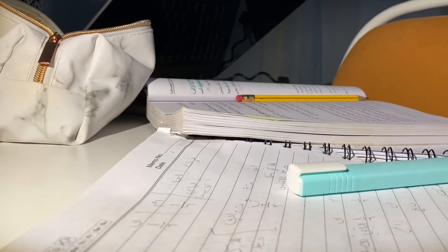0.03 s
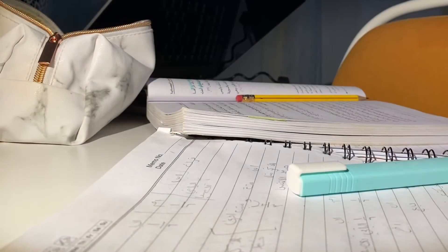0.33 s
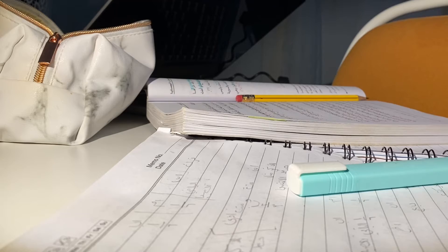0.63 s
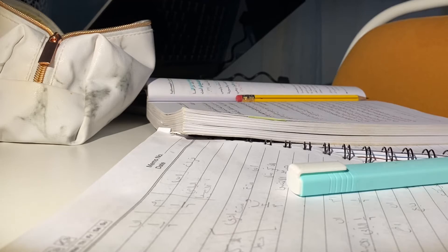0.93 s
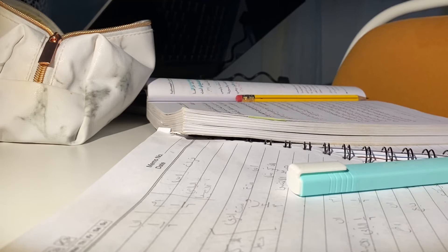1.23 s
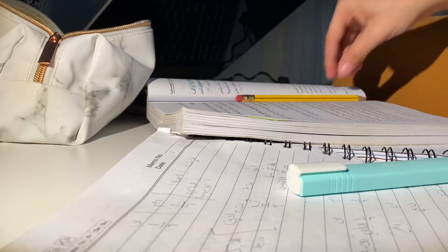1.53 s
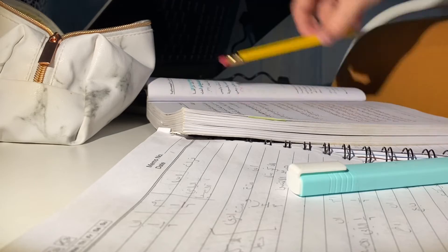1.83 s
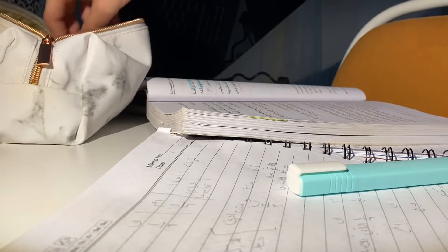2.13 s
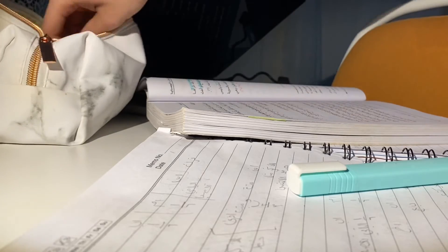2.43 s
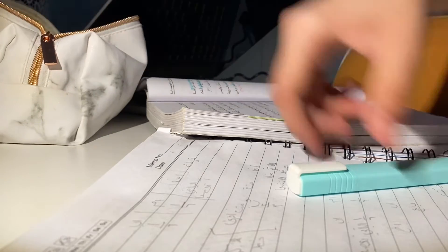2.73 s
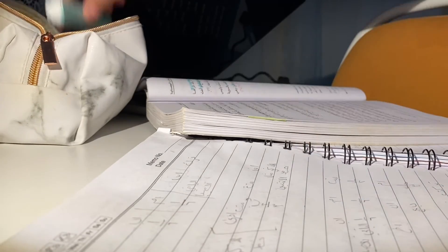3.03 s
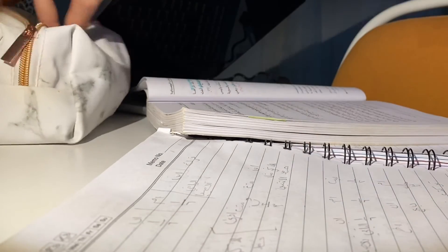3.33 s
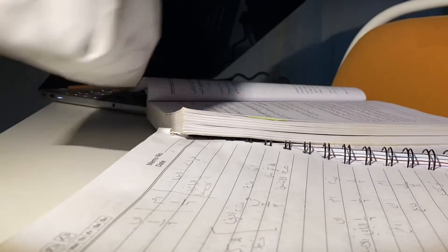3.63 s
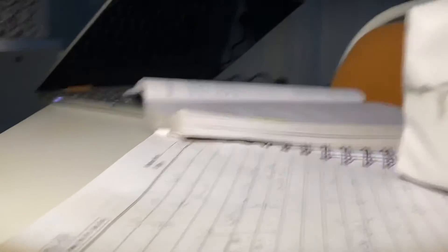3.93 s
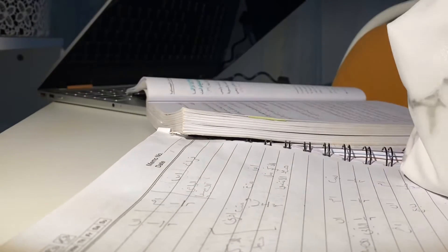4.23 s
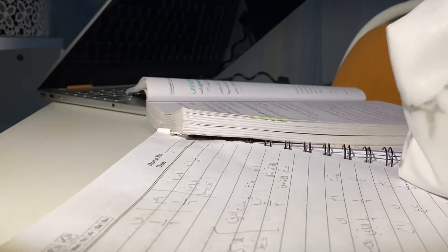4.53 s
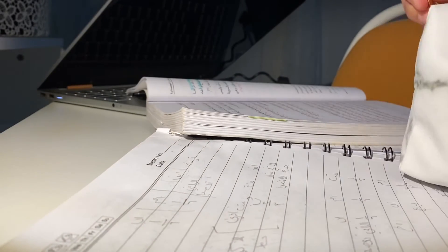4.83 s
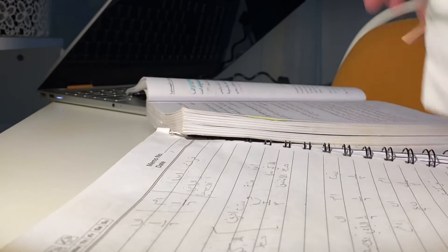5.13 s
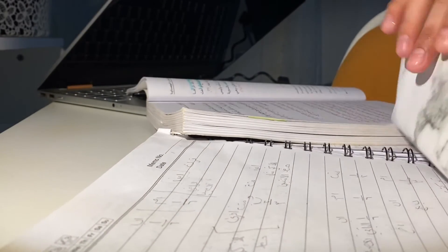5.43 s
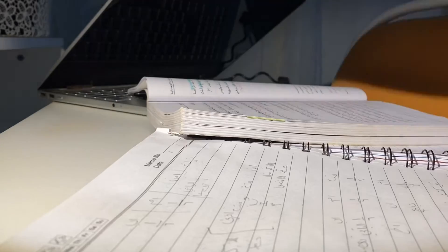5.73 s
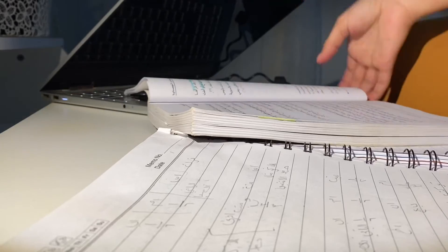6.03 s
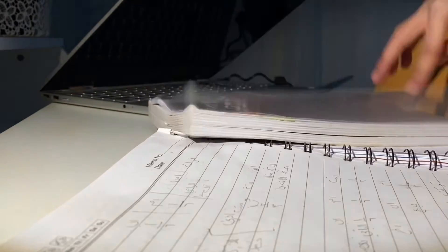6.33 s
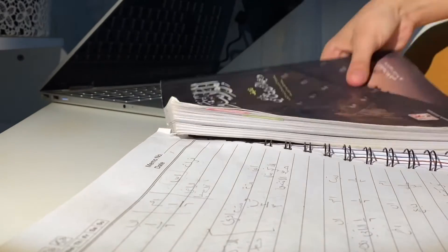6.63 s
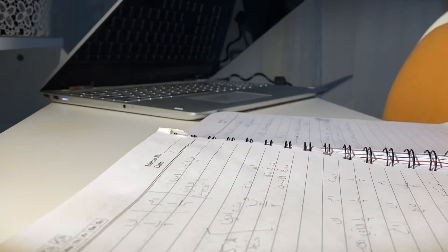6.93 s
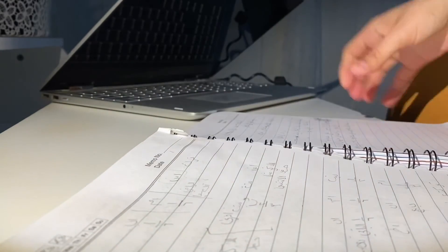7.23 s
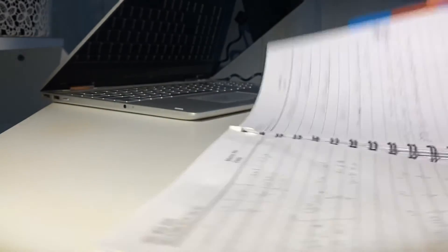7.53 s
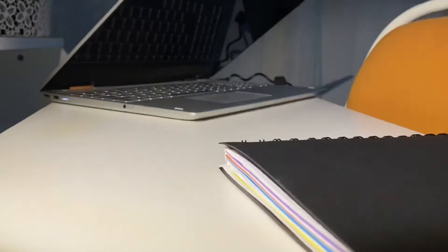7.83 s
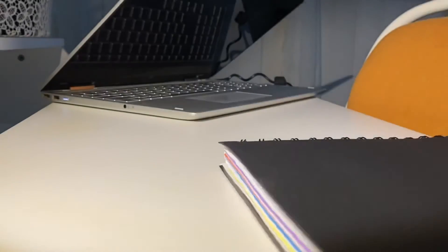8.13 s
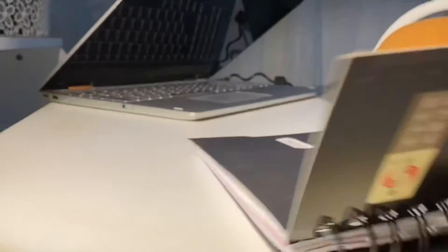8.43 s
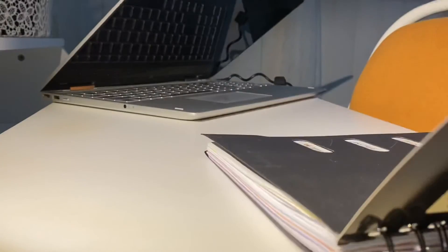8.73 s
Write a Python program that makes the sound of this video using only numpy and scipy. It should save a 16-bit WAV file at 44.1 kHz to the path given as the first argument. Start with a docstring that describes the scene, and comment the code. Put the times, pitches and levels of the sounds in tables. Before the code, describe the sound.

Someone clears a desk close to the microphone. After a faint rustle of cloth, pens tick into a soft pencil case. The case lands with a sharp knock, then rubs, rattles and gives two short squeaks. Pages brush and a book bumps softly, and a spiral notebook scrapes across the desk, slaps shut and is flipped with a clack. A low fan hum runs underneath in the quiet room.

```python
"""Clearing a desk

In a quiet room with a steady fan hum, a sleeve rustles. A pencil and a highlighter click into a
leatherette case, which is set down, squeaks and is dragged off. A book is closed and lifted; a spiral
notebook slides, flops shut and is turned over. Rubbing is many tiny catches, a squeak is quick
sticking and slipping, and knocks make the desk top, the pens and the wire spiral ring."""
import sys
import numpy as np
from scipy import signal
from scipy.fft import rfft, irfft, next_fast_len
from scipy.io import wavfile
from scipy.ndimage import uniform_filter1d

SR = 44100
rng = np.random.default_rng(int(sys.argv[2]) if len(sys.argv) > 2 else 0)


def wav_out(sig):
    """Save sig, one row per channel (or a flat mono array), as 16-bit PCM at SR to the path in sys.argv[1]."""
    wavfile.write(sys.argv[1], SR, np.round(np.clip(np.atleast_2d(sig).T, -1, 1) * 32767).astype(np.int16))


N = 387638
TIME = np.arange(N) / SR

# tone of soft material rubbing, for case and sleeve: (frequency [Hz], level [dB])
SOFT_RUB_TONE = [(300, -26.5), (560, -10), (720, 3), (1020, 3), (1350, 3), (1800, -0.5), (2600, -5.5),
                 (3300, -14.5), (6000, -67.5)]
# tone of a small, hard tick: (frequency [Hz], level [dB])
TICK_TONE = [(1200, -22), (2800, 0), (4000, 8), (5100, 4), (6000, 2), (7000, 0.5), (8300, -1.5),
             (11000, -1.5), (13800, -5.5), (16000, -10)]


def gain_of(db):
    """Turns decibels into a factor to multiply by."""
    return 10 ** (np.asarray(db) / 20)


def unit_rms(x):
    """Scales a signal to an average strength (rms) of 1."""
    return x / np.sqrt(np.mean(x ** 2) + 1e-20)


def look_up(points, hz):
    """Reads between the rows of a (frequency, value) table, on a log-frequency scale."""
    freqs, values = np.transpose(points)
    return np.interp(np.log(hz + 1), np.log(freqs + 1), values)


def add(mix, start_s, sound):
    """Adds a sound into the mix at the given time."""
    part = mix[..., max(round(start_s * SR), 0):][..., :sound.shape[-1]]
    part += sound[..., :part.shape[-1]]


def panned(x, pan_db):
    """Makes the left side pan_db louder than the right."""
    return x * gain_of([[pan_db / 2], [-pan_db / 2]])


def stereo(left, other, likeness):
    """Blends two noises into left and right: likeness 1 is identical, 0 unrelated."""
    shared = np.clip(likeness, -1, 1)
    return np.array([left, shared * left + np.sqrt(1 - shared ** 2) * other])


def wander(hz, count=N):
    """A random wobble of strength 1, up to about the given rate."""
    size = next_fast_len(count)
    freqs = np.fft.rfftfreq(size, 1 / SR)
    spectrum = rfft(rng.standard_normal(size)) / (1 + (freqs / hz) ** 4)
    return unit_rms(irfft(spectrum, size)[:count])


def coloured(x, tone, size=2048):
    """Gives a sound the tone in a table, with a filter that rings only after each hit."""
    log_gain = np.log(gain_of(look_up(tone, abs(np.fft.fftfreq(size, 1 / SR)))))
    kernel = np.fft.ifft(np.exp(np.conj(signal.hilbert(log_gain)))).real[:size // 2]
    return signal.oaconvolve(x, kernel[None] / np.linalg.norm(kernel), axes=1)[:, :N]


def room_air(above_500_hz_db=-61):
    """Air rushes softly, mostly in the low notes."""
    # tone of the air: (frequency [Hz], level [dB])
    tone = [(30, -34), (60, -22.5), (100, -3), (160, -0.5), (250, 0), (330, -7.5), (480, -5.5), (580, -17),
            (850, -14), (1400, -18), (1650, -13.5), (3100, -32.5), (6000, -43.5), (16000, -57)]
    # how alike the two sides are: (frequency [Hz], likeness [0-1])
    likeness = [(60, 1), (160, 0.98), (300, 1), (550, 0.71), (1650, 0.15), (5000, 0.17), (15000, 0.95)]
    hz = np.fft.rfftfreq(N, 1 / SR)
    noise = stereo(*rfft(rng.standard_normal((2, N))), look_up(likeness, hz))
    spectrum = noise * gain_of(look_up(tone, hz))
    upper_strength = np.std(irfft(spectrum.mean(0) * (hz > 500), N))
    return gain_of(above_500_hz_db) * irfft(spectrum, N) / upper_strength


def fan_hum(hz=188.56, level_db=-40, octave_db=-66, waver_db=0.5, drift=0.002):
    """A fan hums one slightly wavering note with a faint octave above it."""
    phase = 2 * np.pi * np.cumsum(hz * (1 + drift * wander(5.2))) / SR
    hum = np.sqrt(2) * (gain_of(level_db) * np.sin(phase) + gain_of(octave_db) * np.sin(2 * phase))
    return panned(hum * gain_of(waver_db * wander(7.2)), -0.56)


def room_echoes(x, wet_db, t60, treble_t60):
    """Desk and walls scatter echoes; the treble dies first (t60: seconds to fade by 60 dB)."""
    size = SR // 2
    echoes = rng.choice([-1., 1.], (2, size)) * (rng.random((2, size)) < 3000 / SR)
    echoes[:, :SR // 400] = 0
    hz, t, bands = signal.stft(echoes, SR, nperseg=256)
    decay_s = look_up([(500, t60), (10000, treble_t60)], hz)[:, None]
    tail = signal.istft(bands * gain_of(-60 * t / decay_s), SR, nperseg=256)[1]
    return gain_of(wet_db) * signal.fftconvolve(x, tail / np.linalg.norm(tail[0]), axes=1)[:, :N]


def near_echoes(x):
    """Very quick echoes make the sound slightly hollow."""
    # bounces off desk, books and laptop lid: (delay [s], left gain [factor], right gain [factor])
    bounces = [(.0007, -0.052, -0.11), (.0013, -0.13, -0.029), (.0023, 0.11, 0.029), (.0034, .3, .15),
               (.0056, -0.17, -0.19)]
    out = x.copy()
    for delay, *gains in bounces:
        add(out, delay, x * np.array(gains)[:, None])
    return out * np.std(x) / np.std(out)


def swell(start, length, rise_share=0.28, linger_db=-18, linger_s=0.065):
    """The pressure of one stroke rises and falls; then the material settles."""
    peak = start + length * rise_share
    settling = gain_of(linger_db) * (TIME > peak) * np.exp(-abs(TIME - peak) / linger_s)
    return np.maximum(np.interp(TIME, [start, peak, start + length], [0, 1, 0]), settling)


def stroke_force(strokes):
    """How strongly separate strokes drive the desk's rumble, the rub and the hiss."""
    power = np.zeros((3, N))
    for start, length, rub_db, bright_db in strokes:
        rumble_db = -38.5 + 0.48 * (rub_db + 46)  # grows more slowly than the rub
        power += (gain_of([[rumble_db], [rub_db], [rub_db + bright_db]]) * swell(start, length)) ** 2
    return np.sqrt(power)


def slide_force(curve, layers_db, fade_s=0.018):
    """How strongly one unbroken movement drives rumble, rub and hiss."""
    times, db = np.transpose(curve)
    moving = np.clip(np.minimum(TIME - times[0], times[-1] - TIME) / fade_s + 1, 0, 1)
    return gain_of(layers_db)[:, None] * gain_of(np.interp(TIME, times, db)) * moving


def grit(per_s, spread_db, smooth, snaps_per_s=70, snap_share=0.28):
    """Tiny catches of uneven size and a few crisp snaps over smooth sliding noise."""
    chance, draw = rng.random(N), rng.standard_normal(N)
    size = np.sign(draw) * gain_of(spread_db * np.minimum(draw ** 2, 4))
    catches = unit_rms(size * (chance < per_s / SR))
    snaps = unit_rms(size * (1 - chance < snaps_per_s / SR))
    return unit_rms(catches + snap_share * snaps / smooth + smooth * rng.standard_normal(N))


def friction(force, rub_tone, hiss_tone, per_s, spread_db, smooth, judder_db,
             rub_likeness, hiss_likeness, rub_pan_db, hiss_pan_db):
    """A moving surface shakes the desk (rumble), the material (rub) and its fibres (hiss)."""
    # tone of the rubbed desk: (frequency [Hz], level [dB])
    rumble_tone = [(40, -38.5), (70, -20), (110, -3), (160, 10), (290, -5.5), (420, -4), (560, -11.5),
                   (1200, -45)]
    desk, body, fibres = force * gain_of(judder_db * (wander(120) - 2.51))  # uneven hand pressure
    grains = grit(per_s, spread_db, smooth), grit(per_s, spread_db, smooth)
    rumble = coloured(desk * stereo(*rng.standard_normal((2, N)), 0.95), rumble_tone)
    rub = coloured(panned(body * stereo(*grains, rub_likeness), rub_pan_db), rub_tone)
    hiss = coloured(panned(fibres * stereo(*grains, hiss_likeness), hiss_pan_db), hiss_tone)
    return rumble + rub + hiss


def sleeve_rustle():
    """Cloth shifts as the arm moves."""
    # the sleeve's movement: (time [s], level [dB])
    movement = [(0.0, -70.5), (0.24, -82.5), (0.288, -70), (0.356, -90), (0.618, -64), (0.934, -68.5),
                (1.02, -112), (1.064, -65.5), (1.14, -85), (1.194, -68.5), (1.528, -83.5), (1.6, -96)]
    # added to that level for each layer: (rumble [dB], rub [dB], hiss [dB])
    layers_db = (-4, -5.5, 1.5)
    # tone of the cloth fibres: (frequency [Hz], level [dB])
    hiss_tone = [(2500, -9.5), (4300, 3.5), (6000, 0), (8000, -3), (10000, 0.5), (12000, -4), (14000, -3),
                 (16000, -9.5)]
    force = slide_force(movement, layers_db)
    force[0] += gain_of(-40.5) * swell(start=0.92, length=0.27)  # a dull, low shuffle
    return friction(force, SOFT_RUB_TONE, hiss_tone, per_s=8800, spread_db=1.5, smooth=1.5,
                    judder_db=1.5, rub_likeness=0.31, hiss_likeness=0.31, rub_pan_db=-5, hiss_pan_db=-.8)


def paper_rustle():
    """Pages and covers brush together, and the notebook slides over the desk."""
    # brushes of paper: (start [s], length [s], rub level [dB], hiss above rub [dB])
    strokes = [(1.683, 0.056, -58, 4), (2.785, 0.08, -45.5, -5), (5.86, .06, -56, -4.5),
               (6.14, 0.22, -61, 0), (6.57, .25, -54, -5), (6.797, 0.027, -38, -18),
               (7.725, 0.073, -24.5, -10), (7.765, 0.13, -34.5, -11), (7.895, 0.099, -41, -3),
               (8.1, 0.15, -50, -2.5), (8.205, .1, -35.5, -6), (8.28, 0.14, -59.5, -6),
               (8.414, 0.043, -25.5, -8), (8.45, 0.15, -45.5, -5.5), (8.6, 0.11, -45.5, -6)]
    # the notebook's slide: (time [s], level [dB])
    slide = [(7.39, -91), (7.42, -56.5), (7.442, -59.5), (7.482, -38), (7.572, -47.5), (7.674, -39),
             (7.7, -49), (7.74, -42.5)]
    # added to that level for each layer: (rumble [dB], rub [dB], hiss [dB])
    layers_db = (-7.5, -0.5, 2.5)
    # tones of the sheets and of their fibres: (frequency [Hz], level [dB])
    rub_tone = [(300, -15.5), (520, -13), (720, 5), (880, -4), (1100, -3), (1450, -1), (2000, -4),
                (2800, -9.5), (3600, -19), (6000, -36.5)]
    hiss_tone = [(1800, -35), (3000, -1.5), (3800, 2.5), (4500, 5), (5600, 1), (7000, -1), (9000, -4),
                 (11000, -5.5), (13500, -10), (16000, -14.5)]
    force = stroke_force(strokes) + slide_force(slide, layers_db)
    return friction(force, rub_tone, hiss_tone, per_s=3300, spread_db=1.5, smooth=1.4, judder_db=3,
                    rub_likeness=0.39, hiss_likeness=0.52, rub_pan_db=-2, hiss_pan_db=0.5)


def case_rub(force):
    """Leatherette rubs with fewer, coarser catches than paper."""
    # tone of the case's surface: (frequency [Hz], level [dB])
    hiss_tone = [(1800, -30), (3000, 7), (3650, 9.5), (4200, 8), (4900, 7.5), (6500, 6), (9500, 3),
                 (11000, 0), (12000, 0.5), (14000, -4.5), (16000, 0.5)]
    return friction(force, SOFT_RUB_TONE, hiss_tone, per_s=700, spread_db=3, smooth=0.82, judder_db=3,
                    rub_likeness=0.49, hiss_likeness=0.19, rub_pan_db=-3, hiss_pan_db=1.2)


def crinkled(x, patch_db=3):
    """As the material bends, different folds ring from moment to moment."""
    hz, _, bands = signal.stft(x, SR, nperseg=512)
    patches = uniform_filter1d(rng.standard_normal(bands.shape[1:]), size=11, axis=0)
    patches = unit_rms(uniform_filter1d(patches, size=3, axis=1))
    depth_db = patch_db * np.minimum(hz / 1500, 1)[:, None]  # small folds mostly change the treble
    return signal.istft(bands * gain_of(depth_db * patches - depth_db / 3), SR, nperseg=512)[1][:, :N]


def case_rattle(hiss_force, per_s=28, boost_db=17, spread_db=3, pan_spread_db=3):
    """Pens and the zip pull tick at random while the case moves."""
    hits = rng.random(N) < per_s / SR
    size, side = rng.standard_normal((2, N))
    ticks = hiss_force * hits * gain_of(boost_db + spread_db * np.clip(size, -2, 2))
    return coloured(ticks * gain_of(pan_spread_db / 2 * np.array([side, -side])), TICK_TONE)


def case_squeaks(jitter=0.23, db_per_octave=-4, pan_db=-3.5):
    """Leatherette sticks and slips so fast that it makes a gliding note with overtones."""
    # one list for each squeak: (time [s], slip rate [Hz], level [dB], roughness [0-1])
    squeaks = [
        [(4.59, 900, -37, 0.4), (4.6, 860, -31.5, 0.26), (4.621, 880, -27.5, 0), (4.63, 1050, -22.5, 0),
         (4.639, 1390, -24, 0.2), (4.649, 1375, -33.5, 0.12), (4.657, 1210, -21.5, 0.1),
         (4.665, 1200, -27.5, 0.16), (4.675, 790, -40, 0.7)],
        [(5.03, 730, -43, 0.4), (5.044, 1060, -33, 0.9), (5.05, 1070, -23, 0.45), (5.06, 990, -48.5, 0.7)],
    ]
    # tone of the case's wall: (frequency [Hz], level [dB])
    wall_tone = [(400, -25), (850, 0.5), (1250, -1.5), (1800, 9), (2700, -5.5), (3100, -19), (3650, -5),
                 (5500, -20), (9000, -41), (16000, -30)]
    out = np.zeros(N)
    for rows in squeaks:
        times, *columns = np.transpose(rows)
        t = np.arange(times[0], times[-1], 1 / SR)
        hz, db, rough = (np.interp(t, times, column) for column in columns)
        turns = np.cumsum(hz * (1 + jitter * rough * wander(590, len(t)))) / SR
        slips = sum(gain_of(look_up(wall_tone, k * hz) + db_per_octave * np.log2(k))
                    * np.sin(2 * np.pi * k * turns) for k in range(1, 11))
        flutter = 1 + .5 * rough * wander(300, len(t))
        add(out, times[0], gain_of(db) * unit_rms(slips * flutter))
    return panned(out, pan_db)


def taps(rows, tick_trim_db=0, knock_t60=0.02, tick_t60=0.0094, scuff_db=-11, scuff_t60=0.01):
    """A brief scuff, a hit, then dying chatter: the object knocks and its edge ticks."""
    knocks, ticks = np.zeros((2, N)), np.zeros((2, N))
    t = np.arange(-400, 3600) / SR  # the hit is at t = 0
    scuff_rise = scuff_db + 60 * t / scuff_t60
    knock_fade, tick_fade = (np.where(t < 0, scuff_rise, -60 * t / t60) for t60 in (knock_t60, tick_t60))
    for time, knock_db, hz, tick_db in rows:
        chatter = np.where(t == 0, 2, stereo(*rng.standard_normal((2, len(t))), likeness=0.41))
        purity = 0.54 * 2 ** ((knock_db - tick_db) / 16)  # the weaker the tick, the purer the knock
        width = 1 + .5 / purity
        b, a = signal.butter(1, [hz / width, min(hz * width, SR / 3)], "band", fs=SR)
        ring = signal.lfilter(b, a, signal.lfilter(b, a, t == t[0]))
        ring /= np.linalg.norm(ring)
        knock = signal.fftconvolve(chatter * gain_of(knock_fade), ring[None], axes=1)
        add(knocks, time + t[0], knock * gain_of(knock_db))
        add(ticks, time + t[0], chatter * gain_of(tick_db + tick_trim_db + tick_fade))
    return panned(knocks, -4.5) + panned(coloured(ticks, TICK_TONE), -0.5)


def ringing(hits, notes, ring_db, spread_db=3, detune=0.015):
    """Small hard things ring; each hit lands differently and brings out different notes."""
    out, t = np.zeros((2, N)), np.arange(SR // 12) / SR
    for time, hit_db in hits:
        for hz, db, t60 in notes:
            strength, tuning = rng.standard_normal(2)
            turns = hz * (1 + detune * tuning) * t + 0.32 * rng.random((2, 1))
            fade = gain_of(hit_db + ring_db + db + spread_db * strength - 60 * t / t60)
            add(out, time, np.sin(2 * np.pi * turns) * fade)
    return out


def pen_clicks(knock_db=-8.5, knock_hz=1640, pan_db=2):
    """Pencil and highlighter hit other pens, and the barrels ring."""
    # pen against pen: (time [s], level [dB])
    clicks = [(2.3586, -48), (2.4005, -37), (2.851, -34.5), (2.8778, -30.5), (2.889, -28.5), (3.1023, -28)]
    # notes of the barrels: (frequency [Hz], level [dB], time to fade 60 dB [s])
    notes = [(2610, -9, 0.013), (3800, -37, 0.0073), (4940, -2.5, 0.012), (6120, -8.5, 0.011),
             (8350, -5, .018), (12100, -9.5, 0.0083), (14300, -3, .015)]
    contacts = taps([(time, db + knock_db, knock_hz, db) for time, db in clicks], tick_trim_db=-1.5)
    return panned(contacts + ringing(clicks, notes, ring_db=-5.5), pan_db)


def spiral_ring():
    """The notebook lands on its wire spiral, and the loops ring."""
    # landings: (time [s], level [dB])
    hits = [(7.7437, -29), (7.7599, -31), (8.4202, -22.5), (8.6577, -36)]
    # notes of the loops: (frequency [Hz], level [dB], time to fade 60 dB [s])
    notes = [(8700, -10.5, 0.012), (11700, -2, 0.011), (12900, -8, 0.0095), (13660, 1, 0.014),
             (14280, -1.5, 0.02)]
    return ringing(hits, notes, ring_db=-3.5)


def object_taps():
    """Covers, zip pull and spiral tap as things are moved."""
    # contacts: (time [s], knock level [dB], knock pitch [Hz], tick level [dB])
    contacts = [(2.455, -37.5, 788, -43), (2.49, -36.5, 699, -49.5), (2.5541, -43, 791, -42.5),
                (3.176, -43.5, 1100, -41), (3.9, -30.5, 2140, -54.5), (3.9584, -18.5, 1190, -24.5),
                (3.963, -22.5, 810, -22.5), (4.414, -37.5, 1780, -40), (4.5609, -35, 1150, -50),
                (4.8115, -34.5, 1570, -46), (4.9621, -40.5, 1770, -41), (5.0282, -30.5, 1320, -33),
                (5.0686, -24.5, 1720, -26), (5.5659, -45.5, 1400, -43), (5.649, -36.5, 1110, -32.5),
                (5.8787, -41, 1360, -58), (6.3155, -37, 1990, -49.5), (6.386, -34, 1190, -40),
                (6.811, -30, 1306, -62), (6.9936, -39.5, 910, -64), (7.4214, -34, 1160, -54),
                (7.678, -28, 1220, -38.5), (7.7318, -21.5, 846, -28), (7.7437, -17.5, 874, -20),
                (7.7599, -20, 1722, -37), (7.7864, -33, 1710, -32.5), (7.7964, -25, 1650, -50),
                (7.8161, -37, 1370, -57), (7.9078, -33.5, 1710, -33.5), (8.4202, -19.5, 1930, -19),
                (8.4344, -20.5, 1530, -36), (8.4751, -39, 800, -35), (8.5008, -40.5, 1050, -37),
                (8.5073, -37, 1320, -32.5), (8.6577, -38, 1080, -29.5), (8.6785, -33.5, 1040, -41)]
    return taps(contacts)


def desk_thuds(low_cut_hz=97):
    """A soft blow rings the desk top; the longer the contact, the duller the thud."""
    # blows on the desk: (time [s], peak level [dB], contact time [s])
    blows = [(2.811, -38.5, 0.0074), (2.886, -37.5, .005), (3.901, -25.5, 0.0037), (3.9597, -10, 0.002),
             (4.582, -30.5, 0.0066), (5.545, -29.5, 0.004), (6.395, -27, 0.0018), (6.507, -25.5, 0.0077),
             (6.519, -24, 0.0023), (6.614, -29.5, 0.0058), (7.7448, -16.5, 0.0046), (7.795, -28, 0.0037),
             (7.837, -25.5, 0.0027), (7.916, -30, 0.0014), (8.42, -23, .0045), (8.433, -21, 0.0073),
             (8.66, -28.5, 0.0061), (8.676, -26, 0.0046)]
    # notes of the desk top: (frequency [Hz], level [dB], time to fade 60 dB [s])
    notes = [(117, -9.5, 0.077), (162, -2, 0.065), (219.4, 2, 0.045), (335, 0.5, 0.026), (465, -14, 0.067),
             (720, -32, .04)]
    out, t = np.zeros(N), np.arange(SR // 4) / SR
    ring = sum(gain_of(db - 60 * t / t60) * np.sin(2 * np.pi * hz * t) for hz, db, t60 in notes)
    # the desk top gives off little deep bass
    ring = signal.sosfilt(signal.butter(6, low_cut_hz, "high", fs=SR, output="sos"), ring)
    for time, db, contact_s in blows:
        push = np.sin(np.pi * np.minimum(t / contact_s, 1)) ** 2
        thud = signal.fftconvolve(ring, push)[:len(t)]
        add(out, time - contact_s / 2, gain_of(db) * thud / abs(thud).max())
    return out


def scene():
    """Things are handled on the desk, with their echoes, over the room's hum."""
    # the case is rubbed and dragged: (start [s], length [s], rub level [dB], hiss above rub [dB])
    case_strokes = [(2.11, 0.21, -48, -11), (2.27, 0.18, -51, -12), (2.41, 0.24, -43, -9.5),
                    (3.088, 0.09, -39, -4.5), (3.16, 0.068, -45, -6), (3.27, 0.096, -49.5, -4.5),
                    (3.365, 0.1, -40.5, -4), (3.45, 0.089, -44, -3.5), (3.513, 0.062, -39, -7),
                    (3.888, 0.053, -32, -11.5), (3.955, 0.073, -35, -3.5), (4.04, 0.13, -45.5, -9),
                    (4.18, 0.26, -46, -7), (4.45, 0.16, -38, -9), (4.553, .13, -31, -6.5),
                    (4.655, 0.092, -29, -16.5), (4.76, 0.15, -41.5, -10), (4.95, 0.17, -40, -7),
                    (5.012, 0.087, -30.5, -7), (5.15, 0.17, -45.5, -12.5), (5.3, 0.078, -40.5, -5),
                    (5.368, 0.087, -32.5, -6.5), (5.448, 0.13, -39, -3), (5.55, 0.089, -33, -1),
                    (5.637, 0.042, -32, -4)]
    case_force = stroke_force(case_strokes)
    rubbing = crinkled(case_rub(case_force) + paper_rustle()) + sleeve_rustle()
    clicking = case_rattle(case_force[2]) + object_taps() + pen_clicks()
    handling = near_echoes(rubbing + clicking) + case_squeaks() + spiral_ring()
    thuds = desk_thuds()
    echoes = room_echoes(handling + 0.22 * thuds, wet_db=-13.5, t60=0.26, treble_t60=0.12)
    return handling + thuds + echoes + fan_hum() + room_air()


def record(dry, top_hz=15950):
    """Two spaced microphones hear the desk; the level dips briefly and the highest treble is cut."""
    # how far the left side's wave runs ahead of the right's: (frequency [Hz], phase [radians])
    phase_lead = [(60, 0.32), (188, 0.12), (400, 0.096), (600, -0.98), (1120, 1), (2000, -1.13),
                  (4500, 0.38), (6500, 1), (8300, -0.58), (12000, 0.98), (16000, -.2)]
    # the dip, whose first and last levels hold before and after it: (time [s], level [dB])
    dip = [(5.935, 1.5), (5.955, -2.5), (5.972, -24), (5.99, -2.5), (6.01, 2)]
    shift = np.exp(.5j * look_up(phase_lead, np.fft.rfftfreq(N, 1 / SR)))
    pair = irfft(rfft(dry) * np.array([shift, shift.conj()]), N)
    dipped = pair * gain_of(np.interp(TIME, *np.transpose(dip)))
    low_pass = signal.firwin(511, top_hz, window=("kaiser", 9), fs=SR)
    return signal.oaconvolve(dipped, low_pass[None], "same", axes=1)


dry = scene()
out = record(dry)
wav_out(out)
```